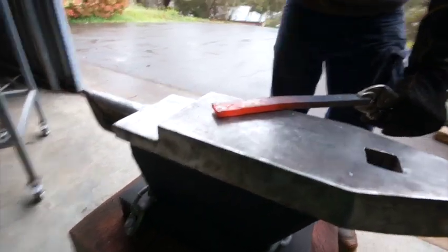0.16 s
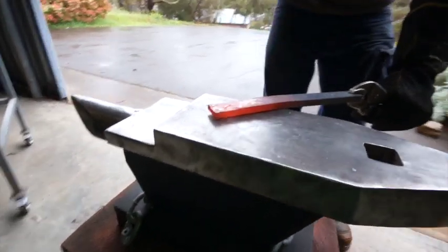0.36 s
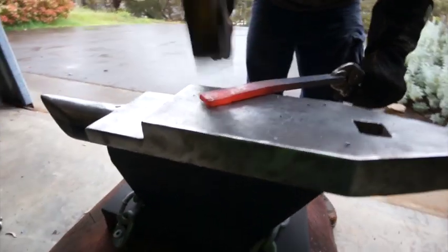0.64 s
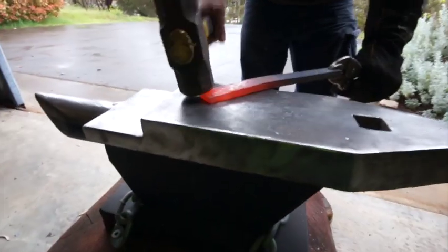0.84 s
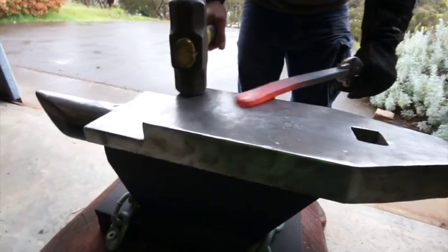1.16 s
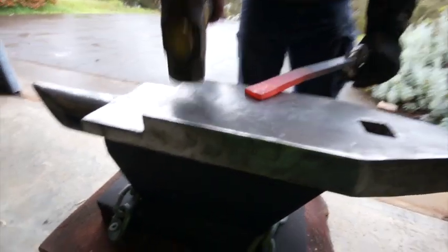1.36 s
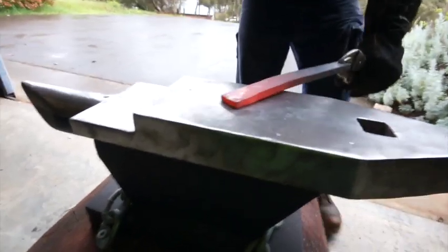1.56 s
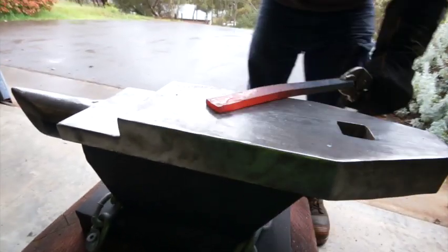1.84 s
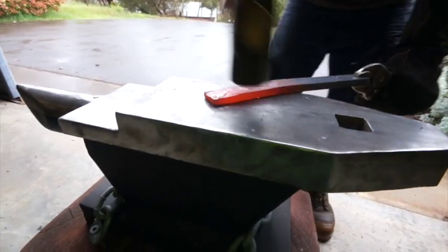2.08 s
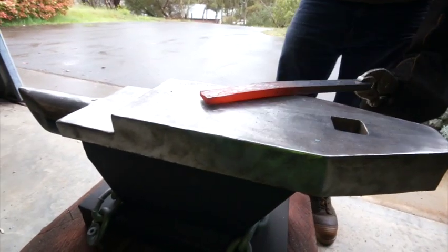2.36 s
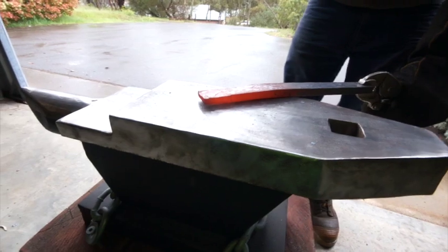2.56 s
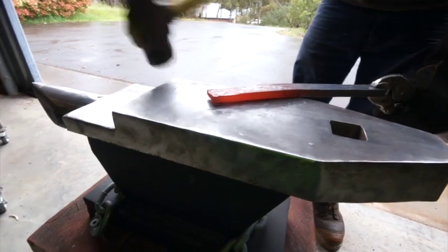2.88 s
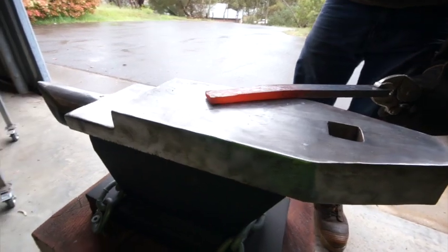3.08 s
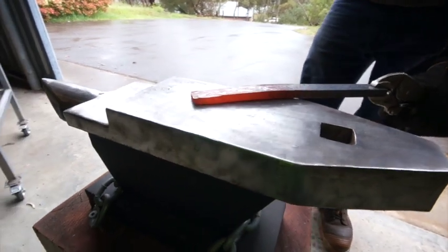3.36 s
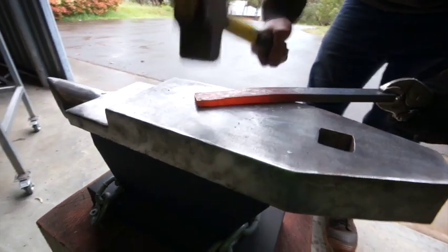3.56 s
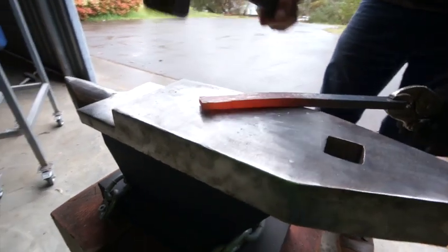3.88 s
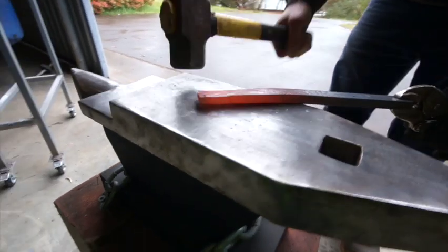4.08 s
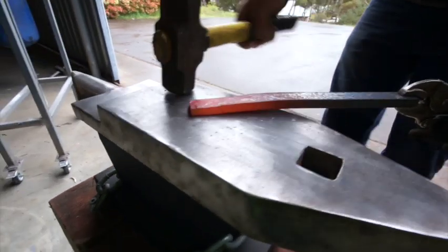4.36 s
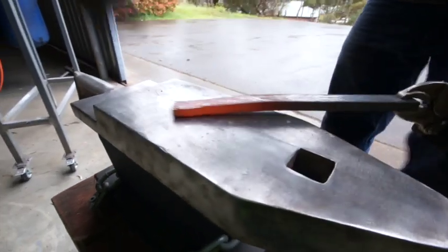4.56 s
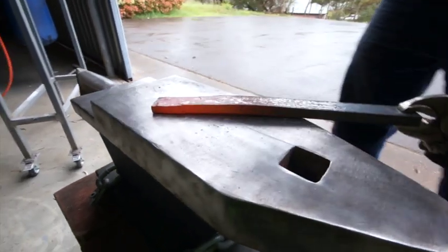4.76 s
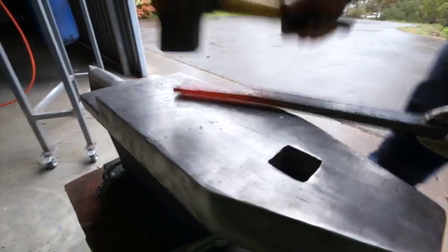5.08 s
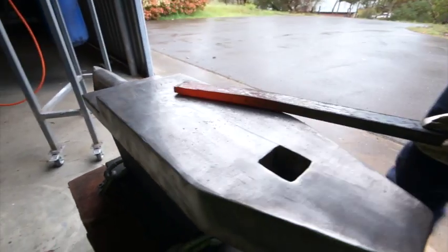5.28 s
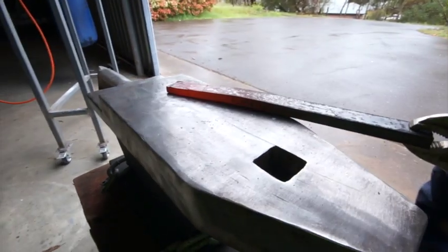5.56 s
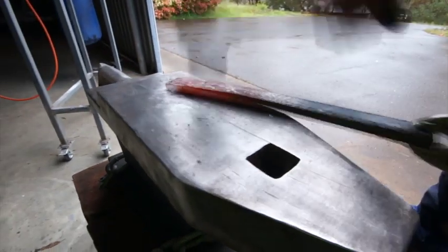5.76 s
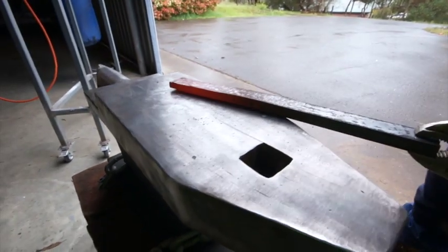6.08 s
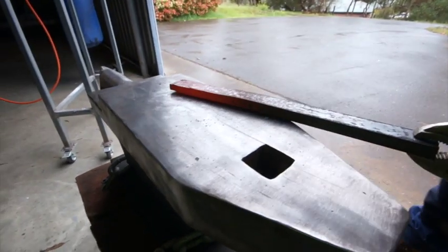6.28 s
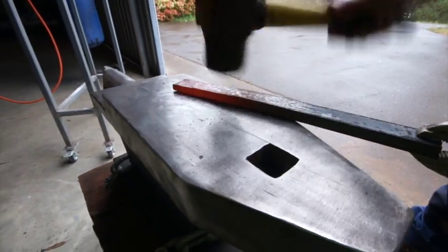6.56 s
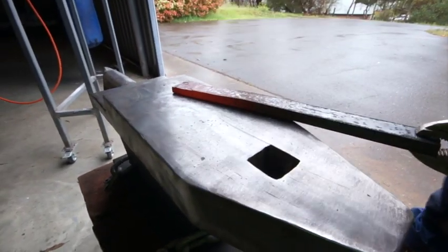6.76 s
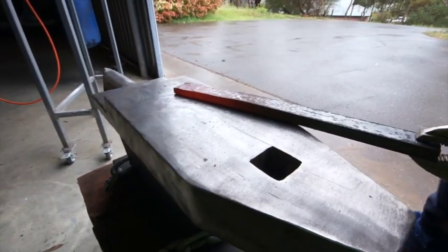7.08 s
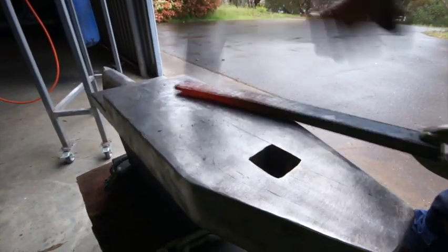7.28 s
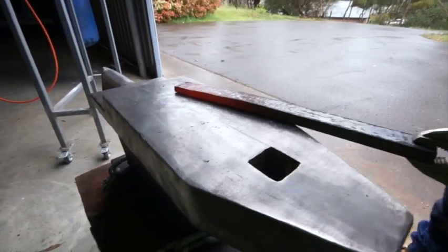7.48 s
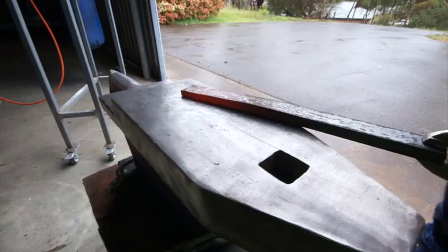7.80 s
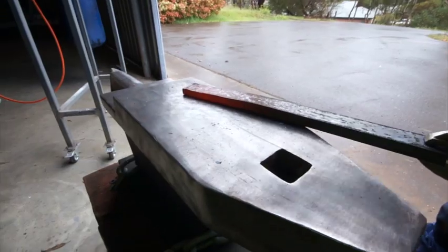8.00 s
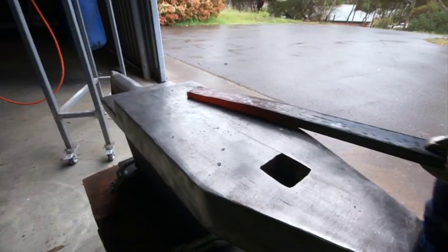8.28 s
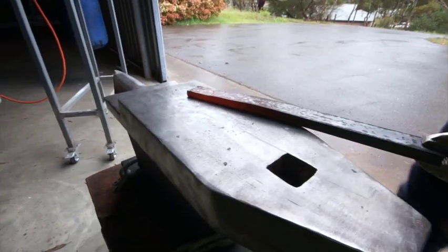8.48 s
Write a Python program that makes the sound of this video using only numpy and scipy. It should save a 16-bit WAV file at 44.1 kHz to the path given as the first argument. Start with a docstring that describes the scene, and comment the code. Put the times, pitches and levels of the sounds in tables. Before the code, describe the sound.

The tail of a blow rings out over steady burner roar. Heavy hammer strikes follow, first slapping a bent bar flat with a woody hollow knock, then landing about every three quarters of a second. Light steel taps bounce on the anvil between some blows. A close, wide stereo pickup in a hard-walled workshop overloads slightly, dipping the background after each hit.

```python
"""The tail of a hammer blow opens the scene, in a metal shed where a gas forge roars and hisses throughout.
A smith flattens a hot steel bar on an anvil: each blow is a noise crack, an air push, a spit of scale,
ringing steel modes and a swelling shed boom; the next two also slap the bent bar down with a hollow knock.
Light clicks of hammer on anvil follow the first slap and return midway; then spaced blows go on to the end.
A gain control ducks the whole mix when it gets loud and lets the roar swell back."""
import sys
import numpy as np
from scipy import signal
from scipy.fft import rfft, irfft, next_fast_len
from scipy.io import wavfile
from scipy.ndimage import map_coordinates

SR = 44100
rng = np.random.default_rng(int(sys.argv[2]) if len(sys.argv) > 2 else 0)


def master_out(mix):
    """Clip the mix to full scale and print it as 16-bit PCM to the path in sys.argv[1]."""
    frames = np.transpose(np.atleast_2d(mix))
    ceiling = np.clip(frames, -1, 1)
    pcm = np.round(ceiling * 32767).astype(np.int16)
    wavfile.write(sys.argv[1], SR, pcm)


N = 380583

# anvil modes: (frequency [Hz], level before colouring [dB], t60 at length 1 [s], build-up at length 1 [s])
ANVIL_MODES = [(1756, -1, .56, .012), (2043, 2, .56, .052), (3070, -16, .75, .012), (3424, -22, .5, .012),
               (4116, -9, .6, .012), (4132, -9, .6, .012), (4597, -16, .65, .01), (4800, -19, .55, .01),
               (5112, -16, .45, .006), (5182, -10, .58, .01), (5346, -17, .55, .01), (5790, -16, .45, .006),
               (5832, -9, .72, .018), (6293, -12, .5, .006), (6470, -22, .4, .006), (6923, -25, .45, .006),
               (7111, -21, .5, .006), (7531, -22, .5, .006), (8037, -24, .4, .006), (8275, -16, .45, .006),
               (8500, -22, .35, .006), (8840, -25, .35, .006), (9000, -27, .35, .006)]
# pitches between which the colour of the anvil's ring is set: (frequency [Hz])
RING_PITCHES = [1756, 2043, 4125, 5180, 5830, 8275]


def amp(db):
    """Decibels to gain."""
    return 10 ** (np.asarray(db) / 20)


def along(points, hz):
    """(Hz, value) points read on a log frequency axis."""
    f, v = np.transpose(points)
    return np.interp(np.log(hz + 1), np.log(f + 1), v)


def seconds(size):
    """Time of each sample."""
    return np.arange(size) / SR


def wobble(rate, size):
    """A smooth random curve, rate knots a second."""
    knots = rng.standard_normal(int(size * rate / SR) + 4)
    coarse = np.arange(0, size + 64, 64)
    return np.interp(np.arange(size), coarse, map_coordinates(knots, [coarse * rate / SR]))


def filtered(x, response):
    """x times a response of frequency."""
    size = x.shape[-1]
    padded = next_fast_len(size + SR // 8)
    spectrum = rfft(x, padded) * response(np.fft.rfftfreq(padded, 1 / SR))
    return irfft(spectrum, padded)[..., :size]


def noise(density_db, size):
    """Stereo noise with a given level per Hz; left and right are most alike in the low range, least on top."""
    # left-right likeness: (frequency [Hz], correlation [-1 to 1])
    likeness = [(30, 0.76), (150, 0.97), (450, .95), (1000, 0.76), (2000, 0.45), (4000, 0.53),
                (12000, 0.11)]

    def mid_side(hz):
        turn = np.arccos(np.clip(along(likeness, hz), -1, 1)) / 2
        return amp(density_db(hz)) * np.sqrt(SR / 2) * np.array([np.cos(turn), np.sin(turn)])

    mid, side = filtered(rng.standard_normal((2, size)), mid_side)
    return np.array([mid + side, mid - side])


def add(track, s, sound):
    """Mix a sound into the track from time s on, cut at both ends of the track."""
    start = round(s * SR)
    part = sound[..., max(-start, 0):max(N - start, 0)]
    track[:, max(start, 0):max(start, 0) + part.shape[-1]] += part


def lagged(x, lag):
    """One-pole smoothing over lag seconds."""
    keep = np.exp(-1 / (lag * SR))
    return signal.lfilter([1 - keep], [1, -keep], x)


def blows(crack_t60=0.011, rebound=0.0045, scale_t60=0.19, grain_db=4, grain_rate=700):
    """The hammer squashes the soft bar: a crack, a low push of air, a spit of scale, then anvil and shed ring on."""
    # full blows: (time [s], force [dB], thump [dB], spit of scale [dB], length factor of ring and boom,
    # trim of the anvil's second mode [dB], brightness of the ring [dB])
    blow_list = [(-.16, -2, 0, 3, 0.91, -6, -3), (.628, -1.6, 4, -4.5, .93, -2, 1.5),
                 (2.007, -1, 8, -13, 0.74, -4.5, -3), (2.748, -2.5, -12, -3.5, 1.07, -4.5, -7),
                 (3.537, -3, 12, -5, 1.05, -3.5, -2.5), (5.041, -0.5, -4, -4.5, 0.97, -4, -5.5),
                 (5.781, 1, -7, 0.5, 1.06, 2.5, -13), (6.519, 2, -17, 1.5, 1.02, -2, -8),
                 (7.296, .6, -10, 4.5, 1.05, -3, 1.5), (8.086, -1.5, -12, -.5, 1.05, 2.5, 2)]
    # crack at the instant of contact, before force and edge: (frequency [Hz], level [dB per Hz])
    crack_spectrum = [(60, -78), (400, -17), (1000, -21), (2200, -32), (4000, -29), (7000, -32.5),
                      (11000, -38.5), (14000, -32.5)]
    # shattering oxide scale, before each blow's spit: (frequency [Hz], level [dB per Hz])
    scale_spectrum = [(800, -41.5), (2600, -37.5), (3600, -30.5), (5500, -36.5), (8000, -50), (11000, -48),
                      (14000, -59)]
    # how strongly a blow through the bar rings the anvil at each ring pitch: (level before force [dB])
    bar_ring_db = [4, 0.5, 3.6, 1.4, 1, 2]
    # how far each ring pitch follows the blow's brightness: (share)
    bright_share = [0.039, 0.026, 1, 0.066, 0.76, 0.78]
    first_mode_trade = .3  # dB lost in the first mode per dB gained in the second
    push = .00042  # s, from the start of the air push to its peak

    out, t = np.zeros((2, N)), seconds(SR // 5)
    for s, force_db, thump_db, scale_db, length, second_db, bright_db in blow_list:
        edge = [(2000, 0), (11000, 0.71 * scale_db)]  # brittle scale sharpens the crack
        crack = noise(lambda hz: along(crack_spectrum, hz) + along(edge, hz), len(t))
        crack *= amp(force_db - 60 * t / crack_t60)

        flakes = amp(scale_db + grain_db * wobble(grain_rate, len(t)) - 60 * t / scale_t60)
        spit = flakes * noise(lambda hz: along(scale_spectrum, hz), len(t))

        thump = -amp(thump_db) * t / push * np.exp(-t / push)

        ring_db = force_db + np.array(bar_ring_db) + bright_db * np.array(bright_share)
        ring_db[:2] += second_db * np.array([-first_mode_trade, 1])
        colour = list(zip(RING_PITCHES, ring_db))

        add(out, s, crack + spit)
        add(out, s - push, thump - lagged(thump, rebound))  # air is pushed aside as the faces meet, then flows back
        add(out, s, amp(force_db) * shed(length))
        add(out, s, ring(ANVIL_MODES, colour, length, prompt=0.3))
    return out


def ring(modes, colour, length=1, prompt=.3):
    """Steel modes: a steady direct tone plus wavering echoes; the prompt share starts at once, the rest builds up."""
    direct, echo = .62, .55  # gains
    waver_rate, detune = 36, .0007  # knots per second, relative spread of pitch
    out = np.zeros((2, SR))
    for hz, db, t60, build in modes:
        t = seconds(int(min(t60 * length, 1) * SR))
        decay = amp(db + along(colour, hz) - 60 * t / (t60 * length))
        growth = (1 - np.exp(-t / (build * length))) ** 2
        level = decay * (prompt + (1 - prompt) * growth)
        # each strike shifts every mode slightly
        phase = 2 * np.pi * (hz * rng.normal(1, detune) * t + rng.random())
        sine, cosine = level * np.sin(phase), level * np.cos(phase)
        for ear in out:
            in_phase, quadrature = (echo * wobble(waver_rate, SR)[:len(t)] for _ in range(2))
            ear[:len(t)] += (direct + in_phase) * sine + quadrature * cosine
    return out


def shed(length=1, swell=0.079, steep=2.57):
    """Near walls scatter the crack at once; the sheet-metal hall booms a moment later."""
    # scattered crack at its start: (frequency [Hz], level [dB per Hz])
    scatter_spectrum = [(100, -90), (500, -35), (1000, -31.5), (2300, -47), (3500, -68), (4700, -56),
                        (7000, -48), (9000, -51), (11000, -58), (14000, -58)]
    # decay of the scatter: (frequency [Hz], t60 [s])
    scatter_t60 = [(200, 0.36), (1000, 0.91), (4000, 0.75), (12000, 0.28)]
    # boom at the top of its swell: (frequency [Hz], level [dB per Hz])
    boom_spectrum = [(40, -72), (130, -47), (280, -35), (550, -35), (850, -35), (1080, -33.5),
                     (1400, -44.5), (1900, -46.5), (2300, -53), (2900, -45.5), (3800, -44.5), (5000, -49),
                     (6500, -53), (12000, -71)]

    t = seconds(SR)
    burst = noise(lambda hz: along(scatter_spectrum, hz), SR)
    hz, frames, bins = signal.stft(burst, SR, nperseg=256)
    decay = amp(-60 * frames / along(scatter_t60, hz)[:, None])
    scatter = signal.istft(bins * decay, SR, nperseg=256)[1][:, :SR]

    age = t / (swell * length)
    boom = noise(lambda hz: along(boom_spectrum, hz), SR) * (age * np.exp(1 - age)) ** steep
    return scatter * (1 - np.exp(-t / 0.00057)) + boom


def slaps():
    """The bent bar is driven flat against the anvil with a short, hollow knock of band-limited noise."""
    # knocks: (time [s], level [dB per Hz at the knock's pitch])
    slap_list = [(0.6287, -20), (2.007, -14.5)]
    pitch, width_octaves, t60 = 1036, 0.2, 0.034  # Hz, octaves, s
    out, t = np.zeros((2, N)), seconds(SR // 10)
    for s, db in slap_list:
        def density(hz):
            octaves = np.log2((hz + 1) / pitch)
            return db - 20 * np.log10(1 + (octaves / width_octaves) ** 2)

        add(out, s, noise(density, len(t)) * amp(-60 * t / t60))
    return out


def taps(click_t60=0.017, width_octaves=0.25, click_db=-31, snap_db=-18, shed_db=-15):
    """Light steel-on-steel contacts: a short click that briefly rings the anvil and the hammer head."""
    # light taps and bounces: (time [s], click [dB], click pitch [Hz], ring [dB])
    tap_list = [(.790, -4, 4000, -45.5), (1.043, -12, 1120, -25), (4.035, -1, 2880, -8),
                (4.157, -2, 3060, -14.5), (4.218, -7, 2980, -33), (4.269, -22, 3060, -26)]
    # how strongly the bare hammer rings the anvil at each ring pitch: (level before the tap's ring [dB])
    face_ring_db = [3, 3, 4.5, -1, -2, -13]
    # hammer head modes: (frequency [Hz], relative level [dB], t60 [s], build-up [s])
    hammer_modes = [(6923, 0, .45, .003), (7020, -13, .3, .003)]
    hammer_db, hammer_grows = 5, 2.4  # dB, dB per dB of ring: the head sings only on the hardest taps
    damped = .55  # length factor: the resting hammer shortens the anvil's ring

    out, t = np.zeros((2, N)), seconds(SR // 10)
    colour = list(zip(RING_PITCHES, face_ring_db))
    for s, db, pitch, ring_db in tap_list:
        def density(hz):
            peak = np.exp(-.5 * (np.log2((hz + 1) / pitch) / width_octaves) ** 2)
            snap = amp(snap_db) * np.sqrt(pitch * hz) / (hz + 300) + 1e-6  # broad noise around the peak
            return click_db + db + 20 * np.log10(peak + snap)

        add(out, s, noise(density, len(t)) * amp(-60 * t / click_t60))
        add(out, s, amp(db + shed_db) * shed())
        add(out, s, amp(ring_db) * ring(ANVIL_MODES, colour, damped, prompt=0.41))
        add(out, s, ring(hammer_modes, [(7000, hammer_db + hammer_grows * ring_db)]))
    return out


def forge():
    """The burner's turbulent flame roars in its chamber while the gas jet hisses."""
    # loudness of the roar, followed in part by flame and hiss: (time [s], level [dB])
    roar_levels = [(0, -1), (.9, -2), (1.6, 3), (3, 0), (4.6, 1), (6.9, 1.5), (8.3, -5.3), (8.63, 0)]
    # chamber roar before its level moves: (frequency [Hz], level [dB per Hz])
    roar_spectrum = [(30, -94), (45, -89), (100, -62.5), (130, -62), (175, -50), (230, -46.5), (282, -41.5),
                     (325, -47.5), (390, -41), (470, -40.5), (522, -36.5), (590, -47.5), (700, -58),
                     (1000, -100)]
    # flame above the roar, before its level moves: (frequency [Hz], level [dB per Hz])
    flame_spectrum = [(400, -118), (760, -55), (950, -54.5), (1060, -49.5), (1160, -56.5), (1400, -61.5),
                      (1800, -72.5), (2050, -62.5), (2250, -122), (3000, -100)]
    # gas jet before its level moves: (frequency [Hz], level [dB per Hz])
    jet_spectrum = [(1800, -84), (2500, -64.5), (3100, -64), (3300, -69), (3500, -58.5), (3900, -57),
                    (4800, -64), (5800, -63), (7000, -74), (8500, -78), (9700, -87.5), (10600, -84),
                    (12300, -81.5), (14000, -88)]
    # the gas nozzle's hissy tones: (centre [Hz], width [Hz], level before it moves [dB per Hz])
    nozzle_tones = [(7610, 48, -61.5), (8210, 246, -65.5)]
    hiss_rise, tone_fade = 0.4153, -0.45  # dB per s; the tones' fade is relative to the hiss
    hiss_follows = .3  # share of the roar's level changes, in dB

    t = seconds(N)
    roar_db = np.interp(t, *np.transpose(roar_levels))
    hiss_db = hiss_rise * t + hiss_follows * roar_db
    flutter = wobble(14, N)  # shared by roar and flame
    roar = amp(roar_db + 0.63 * flutter) * noise(lambda hz: along(roar_spectrum, hz), N)
    flame = amp(0.55 * roar_db + 1.2 * flutter) * noise(lambda hz: along(flame_spectrum, hz), N)
    jet = amp(0.78 * wobble(3.37, N)) * noise(lambda hz: along(jet_spectrum, hz), N)
    for centre, width, db in nozzle_tones:
        tone = noise(lambda hz: db - 20 * np.log10(1 + ((hz - centre) / width) ** 2), N)
        jet += amp(tone_fade * t + 1.2 * wobble(7, N)) * tone
    return roar + flame + amp(hiss_db) * jet


def scene():
    """Hammer work in front of the running forge."""
    return blows() + slaps() + taps() + forge()


def tone_colour(hz):
    """Causal response that cuts narrow dips into the tone of the whole mix."""
    # dips: (centre [Hz], width [Hz], depth [dB])
    tone_dips = [(680, 130, 13), (1610, 190, 19), (2380, 220, 5), (9860, 400, 12)]
    response = 1
    for centre, width, depth in tone_dips:
        damping = 1j * hz * width
        response = response * (1 - (1 - amp(-depth)) * damping / (centre ** 2 - hz ** 2 + damping))
    return response


def record(dry, release=0.14):
    """Narrow dips in the tone, a gain control with fast attack and slow release, clipping and the band limit."""
    threshold_db, ceiling, top_hz = -9.5, 1, 14200
    sense, attack = .002, .0008  # s
    x = filtered(dry, tone_colour)
    level_db = 10 * np.log10(lagged(np.mean(x ** 2, axis=0), sense) + 1e-12)
    excess = np.maximum(level_db - threshold_db, 1e-6)
    age = seconds(N) / release
    # each peak's cut in dB fades away exponentially
    held = np.exp(np.maximum.accumulate(np.log(excess) + age) - age)
    x = np.clip(x * amp(-lagged(held, attack)), -ceiling, ceiling)
    return filtered(x, lambda hz: 1 / (1 + (hz / top_hz) ** 120))


dry = scene()
out = record(dry)
master_out(out)
```